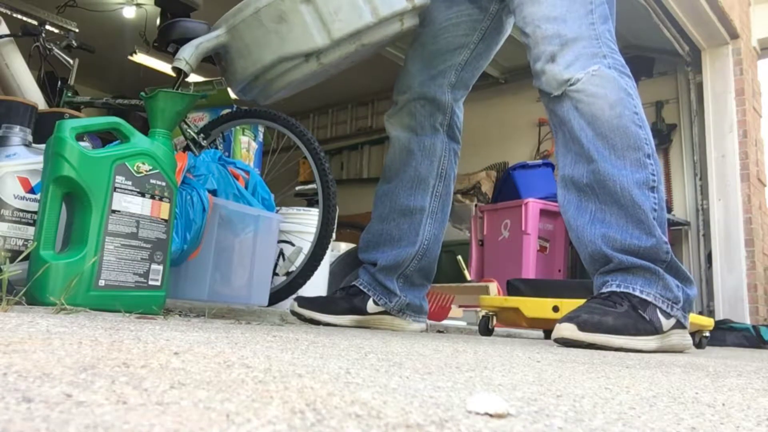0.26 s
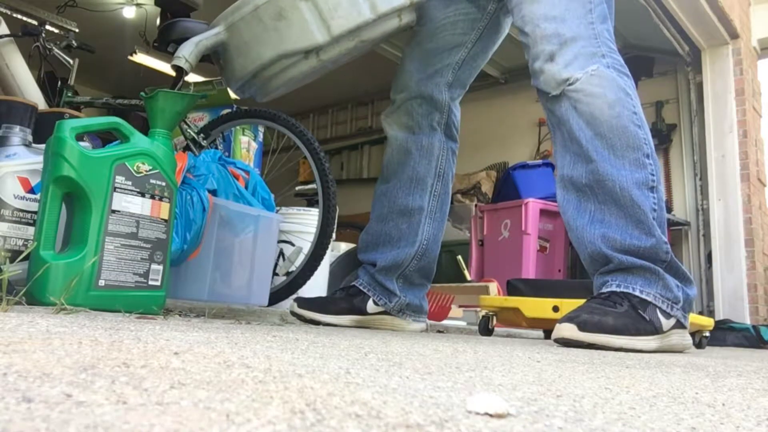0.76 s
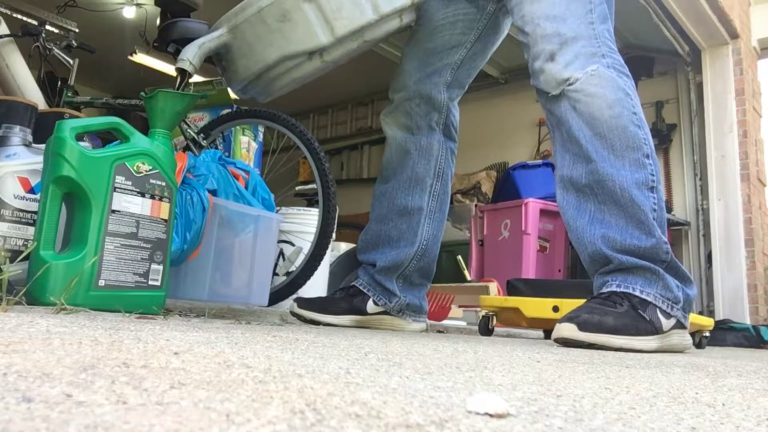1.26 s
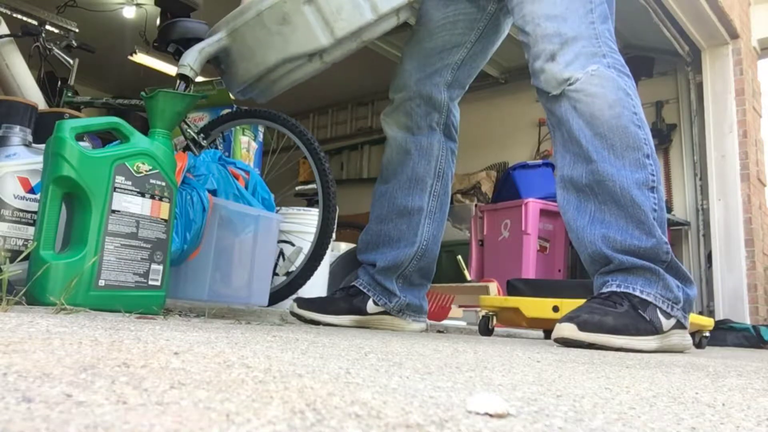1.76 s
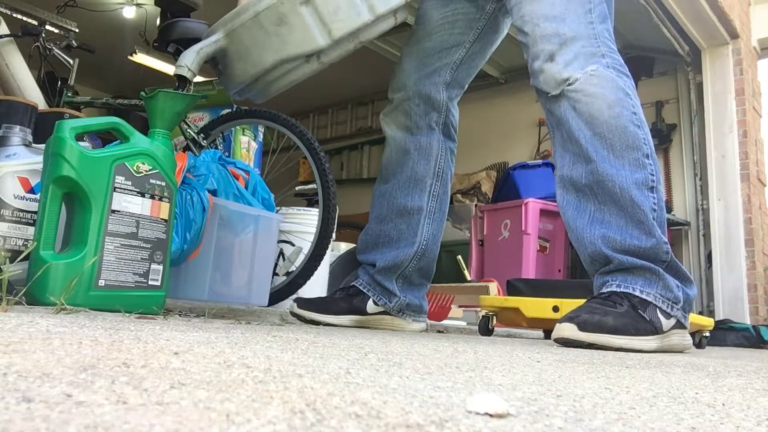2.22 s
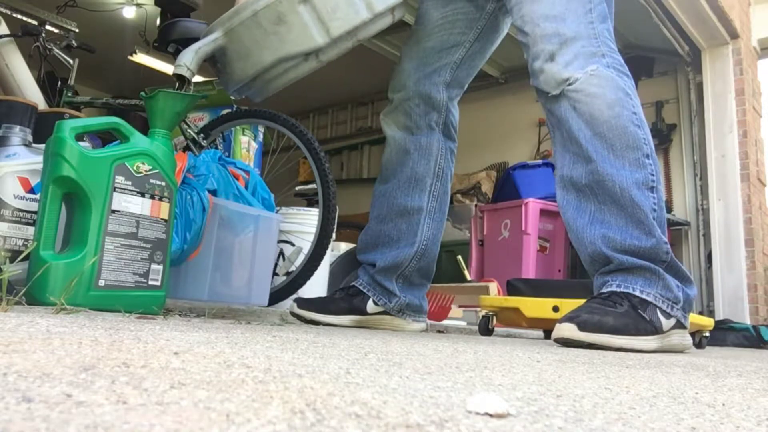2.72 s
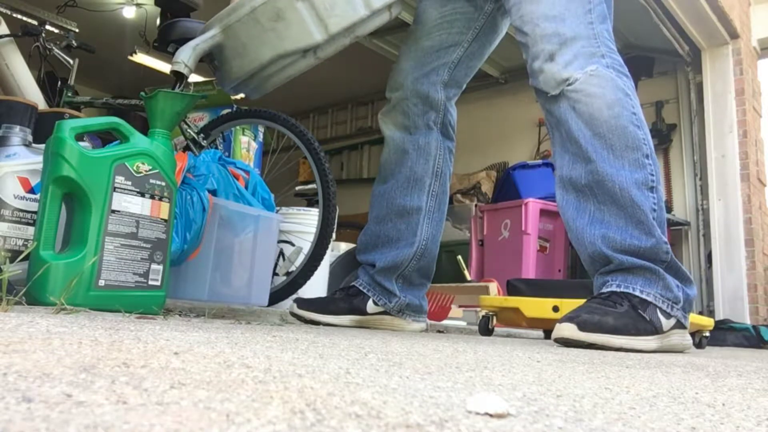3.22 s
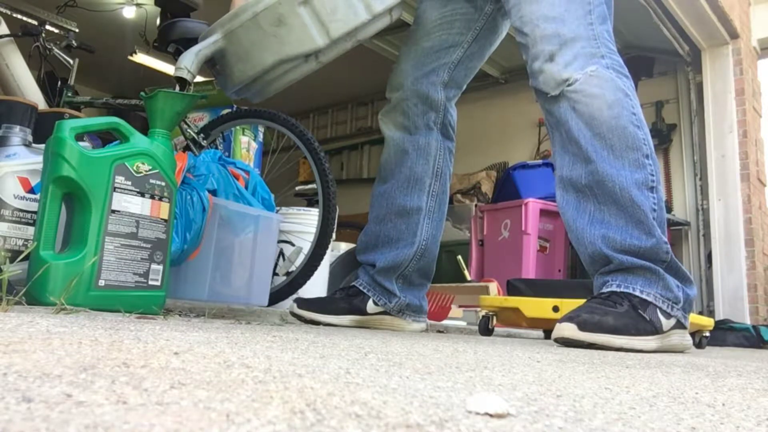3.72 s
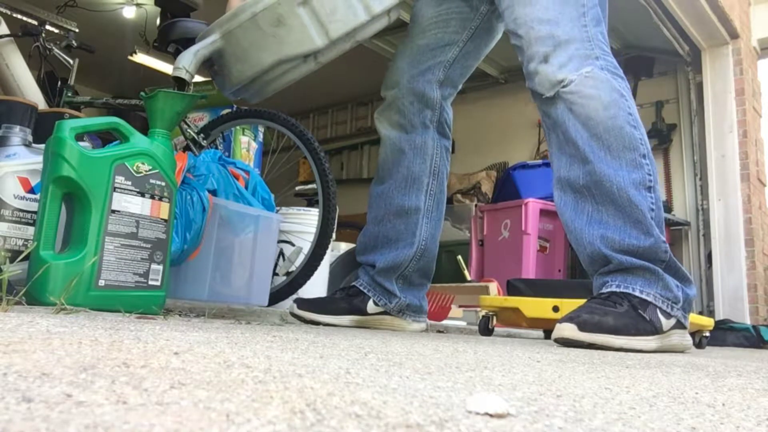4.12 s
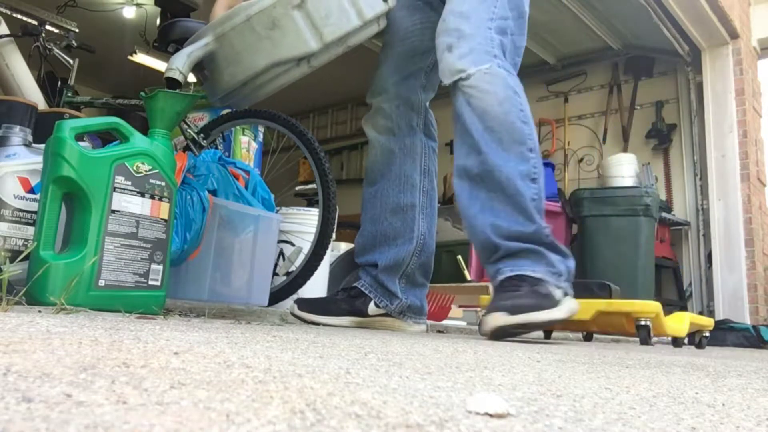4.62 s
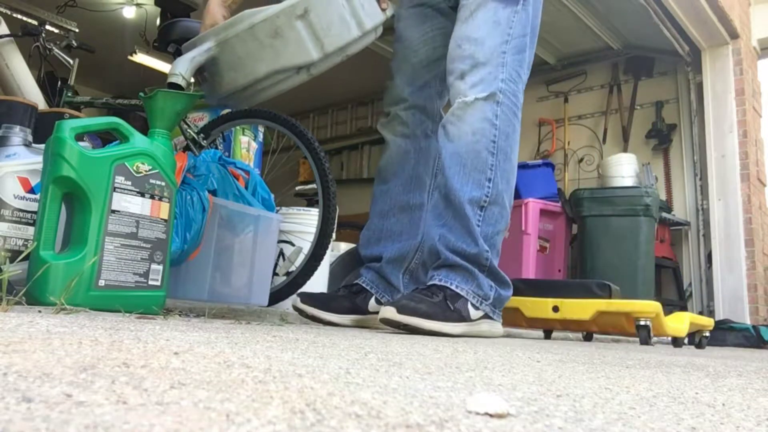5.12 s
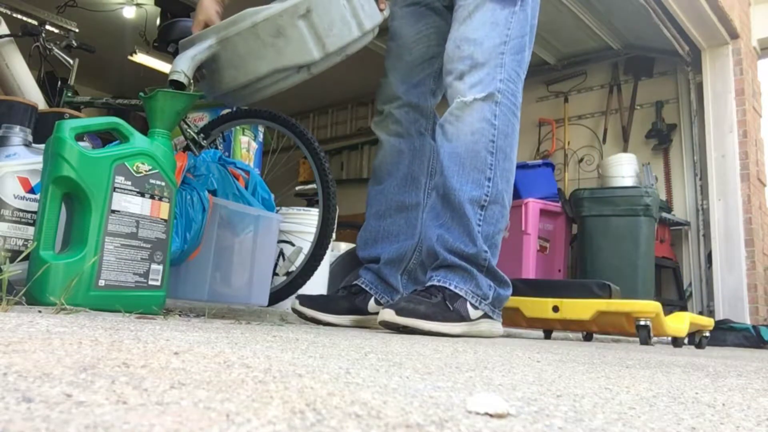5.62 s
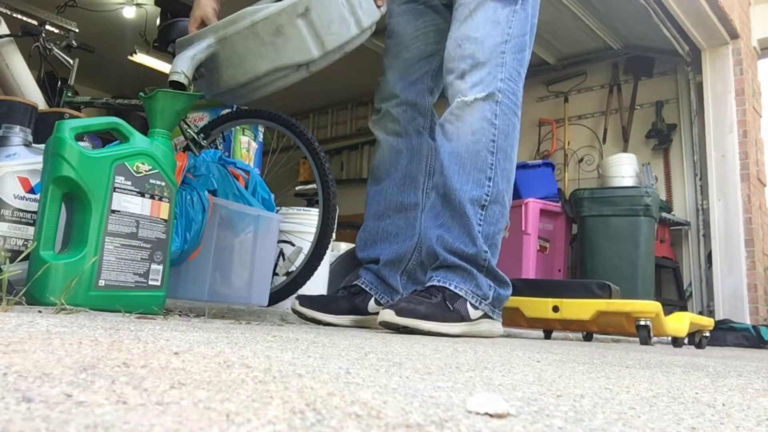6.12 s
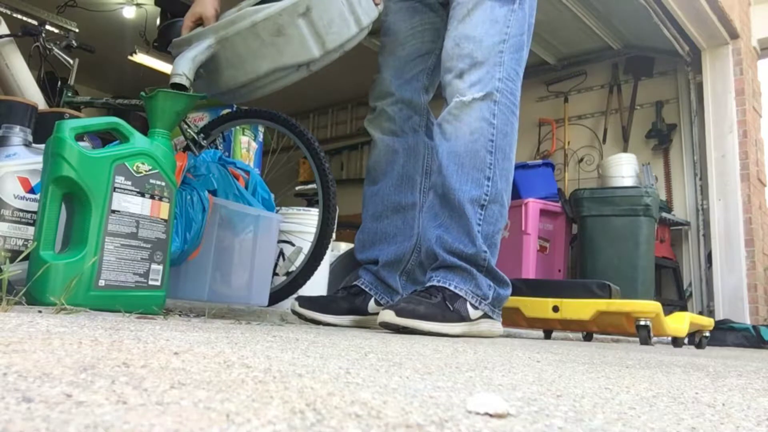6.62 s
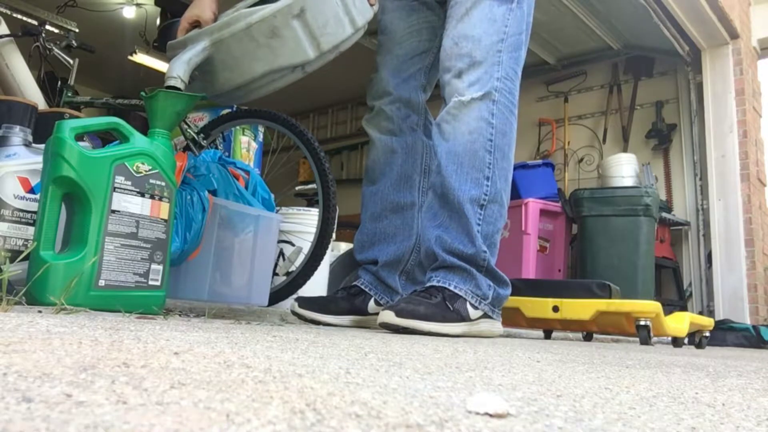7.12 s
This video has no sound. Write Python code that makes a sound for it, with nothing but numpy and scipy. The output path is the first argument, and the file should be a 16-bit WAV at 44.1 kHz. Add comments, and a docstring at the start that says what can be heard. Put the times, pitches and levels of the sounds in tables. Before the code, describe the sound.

Glugging, plopping trickle of oil into a hollow jug, interrupted by a gritty shoe drag ending in a sharp knock, over distant machine hum.

```python
"""Oil poured through a funnel

Used oil trickles from a plastic pan through a funnel into a jug: enveloped bubble swarms, plops and droplets.
Later a shoe drags in three strokes over gritty concrete and lands with a sharp knock: noise through resonances.
Two distant machines, probably air conditioners, hum and beat as detuned sines over rumble, air and hiss.
The garage answers faintly with a few echoes and a decaying noise tail."""
import sys
import numpy as np
from scipy import signal
from scipy.fft import rfft, irfft, next_fast_len
from scipy.io import wavfile
from scipy.ndimage import uniform_filter1d, map_coordinates

SR = 44100
rng = np.random.default_rng(int(sys.argv[2]) if len(sys.argv) > 2 else 0)


def wrap_up_sound(samples):
    """Save the sound to the file named by the first command line argument, as 16-bit audio."""
    columns = np.atleast_2d(samples).T
    # keep every value between -1 and 1, then stretch to whole-number steps
    tamed = np.clip(columns, -1, 1)
    steps = np.round(tamed * 32767).astype(np.int16)
    wavfile.write(sys.argv[1], SR, steps)


N = 324576  # samples

# Levels in tables are relative unless a reference is given.
# distant rumble, soft outdoor air: hz, level_db
RUMBLE_SPECTRUM = [(20, -58), (33, -19), (45, 1.5), (56, -4.5), (67, 8.5), (78, 2), (96, 0), (110, 2),
                   (135, -4), (170, -3.5), (200, -8), (230, -2.5), (330, -13), (600, -51.5)]
AIR_SPECTRUM = [(210, -53), (350, 0), (600, -5), (1050, -5.5), (1400, -12), (2300, -22), (4500, -26),
                (7000, -29), (10000, -37.5), (12000, -36), (16000, -64)]
# high outdoor hiss, perhaps insects: time_s, level_db
HISS_LEVELS = [(0, -68.5), (1.5, -66), (2.7, -73), (3.7, -93), (7.36, -67)]
# its colour: hz, level_db
HISS_SPECTRUM = [(1200, -14), (2200, 1.5), (3300, 2), (4200, 1.5), (5500, -4.5), (7000, -30),
                 (9000, -43), (14000, -53)]
# hum swell: time_s, gain_db
HUM_GAIN = [(2.6, -3), (3.3, 0.5), (5.8, 0.5), (7.2, -4.0)]

# spurts of oil leaving the pan: start_s, length_s, strength_db, fizz_share_db
SPURTS = [(0.14, 0.083, -63, -2), (0.43, 0.03, -61, -9), (0.51, 0.16, -55, 0.5), (0.736, 0.13, -53, -1.5),
          (0.883, 0.083, -51, -1.5), (1.014, 0.061, -55.5, -9), (1.237, 0.024, -59, -1.5),
          (1.389, 0.1, -59.5, -4.5), (1.8, 0.058, -56.5, -6), (1.86, 0.035, -49, -6),
          (1.91, 0.56, -45, -6.5), (2.634, 0.2, -56, -8.5), (2.853, 0.061, -46, -12),
          (2.954, 0.5, -45.5, -5), (3.427, 0.14, -50, -8), (3.787, 0.03, -67, -23),
          (3.931, 0.24, -54, -10.5), (4.204, 0.053, -51, -4), (4.3, 0.14, -46.5, -9.5),
          (4.473, 0.23, -49.5, -1.5), (5.112, 0.16, -56, -4.5), (5.214, 0.11, -53, -9.5),
          (5.4, 0.07, -61, -1), (6.072, 0.2, -56, -21), (6.242, 0.053, -50.5, -7.5),
          (6.344, 0.36, -55.5, -10.5), (6.88, 0.4, -53, -4.5), (7.113, 0.18, -49, -7.5)]
# release: time to die by 60 dB
SPURT_ATTACK_S, SPURT_SWELL_DB_PER_S, SPURT_RELEASE_S = 0.026, 0.5, 0.37
# thread of oil running on between spurts
DRIBBLE_DB, DRIBBLE_FIZZ_DB, DRIBBLE_SWING_DB = -66, -8, 1
# lumps in the stream
LUMP_SWING_DB, LUMPS_PER_S = 2.5, 70
# air booming in the jug: level at full stream, full-stream strength, dB gained per dB of flow
BOOM_DB, FULL_STREAM_DB, BOOM_DB_PER_FLOW_DB = -48, -44.5, 1.24
# flecks of oil spat against the funnel; level relative to the fizz
FLECKS_PER_S, FLECK_DB = 45, -22.5
# share of large bubbles, mostly growing as oil pools in the funnel: time_s, share_db
GURGLE_SHARE = [(0.6, -9.5), (2.6, -7), (3.3, -2), (4.0, -5), (4.5, -1), (7.3, 1)]
# stream colours: hz, level_db
GURGLE_SPECTRUM = [(150, -28), (260, -10), (480, -4.5), (700, 0), (950, -3.5), (1400, -19), (3000, -60)]
FIZZ_SPECTRUM = [(1200, 4), (2300, -3.5), (3400, -2.5), (4800, -9.5), (6900, -6), (8000, -28.5),
                 (11000, -35), (16000, -33)]
BOOM_SPECTRUM = [(150, -2.5), (215, 2.5), (242, 7.5), (290, 2.0), (360, -10.5), (600, -53.5)]
BABBLE_TREBLE = [(2500, -24), (8000, -11)]
FLECK_SPECTRUM = [(3000, -11), (8000, 3), (16000, -16.5)]
# funnel and jug cavity resonances: hz, width_hz, level_db
CAVITY_MODES = [(700, 29, -3.5), (1114, 117, 2), (1700, 46, -3.5), (2094, 60, -3.5)]
# large bubbles bursting in the funnel: start_s, level_db, nominal_pitch_hz, spatter_db (relative to level)
PLOPS = [(0.555, -32, 1970, -7.5), (0.614, -32.5, 1230, -6.5), (0.817, -37, 1180, -12),
         (0.949, -34.5, 1840, -6), (1.06, -32, 1770, -19), (1.151, -29.5, 1235, -22),
         (1.519, -36, 1790, -9.5), (1.609, -41.5, 1136, -24), (1.644, -32, 1120, -24),
         (1.778, -39, 1110, -18), (1.916, -18.5, 1640, -31), (1.984, -25, 1065, -24),
         (2.033, -32, 1240, -16), (2.059, -27, 1080, -15), (2.11, -27, 1090, -12), (2.169, -27, 1082, -10),
         (2.29, -28, 1130, -9), (2.337, -25, 1180, -20), (2.479, -28.5, 1110, -9.5),
         (2.604, -35.5, 1150, -39), (2.688, -32.5, 1126, -32), (2.729, -33.5, 1130, -27),
         (2.887, -28, 688, -34), (3.115, -29, 1100, -36), (3.368, -20.5, 1050, -26),
         (3.583, -35.5, 1100, -34), (3.717, -41.5, 1010, -31), (3.928, -37, 950, -39),
         (3.963, -35, 1150, -43), (4.158, -36.5, 1680, -9), (4.404, -28.5, 633, -35),
         (4.442, -33, 1280, -13), (4.502, -27.5, 1117, -14), (4.537, -27.5, 683, -10),
         (4.625, -25, 1840, -24), (5.311, -38, 1080, -35), (6.102, -38.5, 1200, -41),
         (6.196, -34, 1245, -22), (6.278, -34.5, 1120, -16), (6.61, -28, 1184, -45),
         (6.697, -36, 690, -11.5), (6.827, -34, 646, -17.5), (6.903, -36, 1145, -23),
         (6.972, -34, 770, -26), (7.271, -26.5, 1150, -45)]
PLOP_PITCH_SCALE = 0.979
# clearest small ringing droplets: start_s, level_db, pitch_hz
DROPLETS = [(0.6136, -23, 4400), (0.763, -24.5, 3140), (1.7478, -28, 4530), (1.9454, -25, 3470),
            (2.0402, -22.5, 5270), (2.122, -21, 3300), (2.2874, -27, 4380), (2.5, -22, 3310),
            (3.014, -25, 4350), (3.21, -23, 2820), (3.34, -20.5, 3390), (3.3985, -24, 6500),
            (3.5825, -29, 3300), (5.2648, -24.5, 4230), (6.6817, -27.5, 2940), (7.2512, -25.5, 2760),
            (7.308, -27, 3860)]
# dry ticks of grit and plastic: start_s, level_db
TICKS = [(0.9342, -45), (2.106, -47), (3.01, -47.5), (3.07, -50), (3.331, -46), (4.0686, -46),
         (4.3152, -40.5), (4.492, -45), (4.5225, -37.5), (5.167, -55), (6.3893, -53), (6.528, -50.5),
         (7.1188, -44), (7.2103, -53), (7.306, -50)]

# sole drags: start_s, length_s, rise_s, rub_db, shake_db
DRAGS = [(4.468, 0.18, 0.18, -48, -72), (4.646, 0.058, 0.037, -31, -56),
         (4.759, 0.073, 0.0032, -34.5, -32.5)]
# time to die by 60 dB: drag, then the rustle of loose sand and shoe
DRAG_RELEASE_S, SETTLE_S = 0.049, 0.46
# rustle relative to the drag
RUB_SETTLE_DB, SHAKE_SETTLE_DB = -15.5, -14
# colour of the rubbing sole: hz, level_db
SOLE_SPECTRUM = [(100, -15), (400, -7.5), (750, -2), (1100, 4), (2000, -9), (3700, -3.5), (5000, -9),
                 (8000, -16.5), (11000, -23.5), (16000, -27)]
# sole peeling off loose grit
PEEL_S, PEEL_LENGTH_S, PEEL_DB, PEEL_GRAINS_PER_S = 4.52, 0.091, -52.5, 180
# colour of those grains: hz, level_db
PEEL_SPECTRUM = [(600, -11), (2500, 1), (8000, -2.5), (16000, -9)]
# shoe landing: start_s, level_db
KNOCKS = [(4.8107, -13.5), (4.825, -24.5), (4.8443, -28.5)]
# resonances of the landing: hz, width_hz, level_db
KNOCK_MODES = [(1060, 200, -20), (1540, 130, -2), (2320, 210, 2.5), (2990, 130, -1.5), (3630, 410, -8)]

# garage decay: hz, t60_s
GARAGE_DECAY = [(200, 0.17), (2000, 0.13), (10000, 0.16)]
# walls of jugs and garage: delay_s, level_db
ECHOES = [(.0052, -36.5), (0.0127, -18.5), (0.0225, -20.5)]
TOP_HZ = 15900


def amp(db):
    """Decibels to gain."""
    return 10 ** (np.asarray(db) / 20)


def unit(x):
    """Scale to rms 1."""
    return x / np.sqrt(np.mean(x ** 2) + 1e-20)


def along(points, hz):
    """Interpolate (hz, value) points on a log-frequency axis."""
    f, v = np.transpose(points)
    return np.interp(np.log(hz + 1), np.log(f), v)


def curves(rows):
    """One value per sample for each column after the time."""
    s, *cols = np.transpose(rows)
    return [np.interp(np.arange(N) / SR, s, c) for c in cols]


def wobble(knots_per_s):
    """Smooth random curve."""
    knots = rng.standard_normal(int(N * knots_per_s / SR) + 4)
    return map_coordinates(knots, [np.arange(N) * knots_per_s / SR])


def filtered(x, response):
    """Apply a complex frequency response."""
    m = next_fast_len(N + SR // 2)
    return irfft(rfft(x, m) * response(np.fft.rfftfreq(m, 1 / SR)), m)[:N]


def coloured(x, spectrum):
    """Shape x by a spectrum, at rms 1."""
    return unit(filtered(x, lambda hz: amp(along(spectrum, hz))))


def noise(spectrum):
    """Coloured noise of rms 1."""
    return coloured(rng.standard_normal(N), spectrum)


def bandpassed(x, order, low_hz, high_hz):
    """Butterworth band-pass."""
    sos = signal.butter(order, [low_hz, high_hz], "bandpass", fs=SR, output="sos")
    return signal.sosfilt(sos, x)


def add(track, s, sound):
    """Mix a sound into a track at a time."""
    part = track[max(round(s * SR), 0):][:len(sound)]
    part += sound[:len(part)]


def resonances(modes, hz):
    """Causal response of (hz, width_hz, level_db) modes, alternating in sign."""
    total = 0
    for k, (centre, width, db) in enumerate(modes):
        damping = 1j * hz * width
        total = total + (-1) ** k * amp(db) * damping / (centre * centre - hz * hz + damping)
    return total


def cavity(hz):
    """Response of the air in the funnel and the jug's neck."""
    return resonances(CAVITY_MODES, hz)


def envelope(s, length, attack, release, swell_db_per_s=0):
    """Linear rise, swell until length, then die by 60 dB in the release time."""
    t = np.arange(N) / SR - s
    swell_db = swell_db_per_s * np.clip(t, 0, length)
    fall_db = 60 * np.clip((t - length) / release, 0, 2)
    return np.clip(t / attack, 0, 1) * amp(swell_db - fall_db)


def cracks(per_s, t60):
    """Tiny noise bursts at random moments."""
    t = np.arange(SR // 50) / SR
    hits = (rng.random(N) < per_s / SR) * rng.uniform(0.5, 1, N)
    return signal.fftconvolve(hits, amp(-60 * t / t60))[:N] * rng.standard_normal(N)


def bubble(t, hz, cycles, glide, onset):
    """Ringing bubble: swells over onset cycles, glides from hz to hz * (1 + glide), dies by 1/e in cycles."""
    turns = hz * t
    phase = turns + glide * (turns - cycles * (1 - np.exp(-turns / cycles)))
    return np.sin(2 * np.pi * phase) * np.exp(-turns / cycles) * (1 - np.exp(-turns / onset))


def swarm(per_s, centre_hz, spread, cycles, glide, size_db):
    """Bubbles of random pitch, life and size in clumps averaging four, levelled over a fifth of a second."""
    count = int(per_s * N / SR)
    clump = rng.random(N // 40)
    place, life, lag = rng.random((count, 3), dtype=np.float32).T[:, :, None]
    clump_index = (place * count / 4).astype(int) % len(clump)
    when = clump[clump_index] * N + .022 * SR * lag ** 2
    pitch, size = np.clip(rng.standard_normal((count, 2), dtype=np.float32), -2, 2).T[:, :, None]
    index = np.arange(SR // 80)
    hz = np.minimum(centre_hz * np.exp(spread * pitch), SR / 3)
    lives = cycles * 4 ** (life - .5)
    grains = amp(size_db * size) * bubble(np.float32(index / SR), hz, lives, glide, onset=0.22)
    x = np.bincount((when.astype(int) + index).ravel(), grains.ravel(), N)[:N]
    power = np.abs(uniform_filter1d(x * x, SR // 5))
    return x / np.sqrt(power + 1e-9)


def machines(hum_hz=118.65, beat_hz=1.805, shaft_hz=58.3):
    """Two motors run a little apart in speed, so their hums beat."""
    t = np.arange(N) / SR
    phase = 2 * np.pi * hum_hz * t + 0.21 * wobble(2.89)
    beat = 2 * np.pi * beat_hz * (t - .1)
    hum = amp(-48.0) * np.sin(phase) + amp(-51.0) * np.sin(phase + beat)
    shaft = amp(-51.0 + 1.6 * wobble(7.4)) * np.sin(2 * np.pi * shaft_hz * t + .5 * wobble(1.4))
    overtone = amp(-64.0) * np.sin(2 * phase + wobble(4.2))
    hum_db, = curves(HUM_GAIN)
    return amp(hum_db) * hum + shaft + overtone


def outdoors():
    """Distant rumble, soft air and a high hiss, each as coloured noise."""
    rumble = amp(-48.5) * noise(RUMBLE_SPECTRUM)
    air = noise(AIR_SPECTRUM) * amp(-60.5 + 0.37 * wobble(3.3))
    hiss_db, = curves(HISS_LEVELS)
    return rumble + air + amp(hiss_db) * noise(HISS_SPECTRUM)


def pouring():
    """Gains of the stream and of its fizz: lumpy spurts over a thin dribble."""
    dribble = amp(DRIBBLE_DB + DRIBBLE_SWING_DB * wobble(12))
    flow, froth = np.zeros((2, N))
    for s, length, db, fizz_db in SPURTS:
        spurt = amp(db) * envelope(s, length, SPURT_ATTACK_S, SPURT_RELEASE_S, SPURT_SWELL_DB_PER_S)
        flow = np.maximum(flow, spurt)
        froth = np.maximum(froth, amp(fizz_db) * spurt)
    lumps = amp(LUMP_SWING_DB * wobble(LUMPS_PER_S))
    return lumps * (flow + dribble), lumps * (froth + amp(DRIBBLE_FIZZ_DB) * dribble)


def stream():
    """The stream folds air into the oil: boom and gurgles in the jug, babble in the funnel, fizz on the surface."""
    flow, froth = pouring()
    boom_gain = amp(BOOM_DB) * (flow / amp(FULL_STREAM_DB)) ** BOOM_DB_PER_FLOW_DB
    boom = boom_gain * noise(BOOM_SPECTRUM)

    gurgle_db, = curves(GURGLE_SHARE)
    large = swarm(per_s=500, centre_hz=577.7, spread=0.453, cycles=2.9, glide=0.057, size_db=3.5)
    gurgle = amp(gurgle_db) * coloured(large, GURGLE_SPECTRUM)

    pops = swarm(per_s=800, centre_hz=1419, spread=0.312, cycles=1.48, glide=0.045, size_db=3.0)
    babble = unit(unit(filtered(pops, cavity)) + amp(-5.5) * coloured(pops, BABBLE_TREBLE))

    crackle = swarm(per_s=700, centre_hz=3700, spread=.38, cycles=7, glide=.004, size_db=7)
    snaps = unit((rng.random(N) < 900 / SR) * rng.standard_normal(N))  # thin oil films
    fizz = coloured(crackle + amp(-9.0) * snaps, FIZZ_SPECTRUM)
    flecks = amp(FLECK_DB) * coloured(cracks(FLECKS_PER_S, t60=0.013), FLECK_SPECTRUM)
    return boom + flow * (gurgle + amp(-0.5) * babble) + froth * (fizz + flecks)


def wall_echoes(x):
    """Delayed, weaker copies from hard walls."""
    return sum(amp(db) * np.pad(x, (round(delay * SR), 0))[:N] for delay, db in ECHOES)


def garage(x):
    """Reverberant noise tail, 5 ms late; each frequency dies at its own speed."""
    hz, t, z = signal.stft(rng.standard_normal(SR // 2), SR, nperseg=256)
    fade = amp(-60 * t / along(GARAGE_DECAY, hz)[:, None])
    tail = signal.istft(z * fade, SR, nperseg=256)[1]
    return signal.fftconvolve(x, np.pad(tail, (SR // 200, 0)) / np.linalg.norm(tail))[:N]


def plops():
    """Thick oil damps large bubbles quickly; each sheds a smaller one, rings the funnel and throws a spatter."""
    rings, bursts, spray = np.zeros((3, N))
    t = np.arange(SR // 12) / SR
    splutter = (amp(-60 * t / .03) + amp(-12 - 60 * t / .06)) * (1 - np.exp(-t / .0005))
    for s, db, hz, spatter_db in PLOPS:
        lag, smaller = rng.random(2)
        main = bubble(t, hz * PLOP_PITCH_SCALE, cycles=5.5, glide=0.031, onset=0.4)
        shed = bubble(t, hz * (1.2 + .5 * smaller), cycles=5.3, glide=0.025, onset=0.5)
        add(rings, s, amp(db - 1.0) * main)
        add(rings, s + .008 * lag, amp(db - 7.5) * shed)
        add(bursts, s, amp(db - 13.5) * splutter * rng.choice([-1., 1.], len(t)))
        add(spray, s, amp(db + spatter_db + 7.5) * splutter * rng.standard_normal(len(t)))
    wet = bandpassed(bursts, 3, 500, 2600)
    spatter = bandpassed(spray, 4, 2200, 5200)
    return rings + amp(5.5) * wet + spatter + amp(12.5) * filtered(bursts, cavity)


def droplets():
    """Tiny bubbles ring high and clear, sinking slightly in pitch."""
    track, t = np.zeros(N), np.arange(SR // 20) / SR
    for s, db, hz in DROPLETS:
        add(track, s, amp(db - 10.0) * bubble(t, hz, cycles=10.0, glide=-0.011, onset=0.85))
    return track


def ticks():
    """Short broad cracks with a faint scatter behind them."""
    track, t = np.zeros(N), np.arange(SR // 20) / SR
    fade = amp(-60 * t / .009) + amp(-14 - 60 * t / .05)
    onset = 1 - np.exp(-t / 0.00022)
    for s, db in TICKS:
        add(track, s, amp(db + 6) * fade * onset * rng.standard_normal(len(t)))
    return bandpassed(track, 1, 1800, 7500)


def dragging():
    """Gains of the sole's rub and of the shaking it gives the shoe, over all drags."""
    rub, shaking = np.zeros((2, N))
    for s, length, rise, db, shake_db in DRAGS:
        stroke = envelope(s, length, rise, DRAG_RELEASE_S)
        settle = envelope(s, length, rise, SETTLE_S)
        rub += amp(db) * np.maximum(stroke, amp(RUB_SETTLE_DB) * settle)
        shaking += amp(shake_db) * np.maximum(stroke, amp(SHAKE_SETTLE_DB) * settle)
    return rub, shaking


def peel():
    """Single grains of grit crack as the sole rolls off them."""
    grit = coloured(cracks(PEEL_GRAINS_PER_S, t60=0.0052), PEEL_SPECTRUM)
    return amp(PEEL_DB) * envelope(PEEL_S, PEEL_LENGTH_S, .01, DRAG_RELEASE_S) * grit


def knocks():
    """Each blow of the landing: a hard first contact, then a decaying crunch of random signs."""
    blows, t = np.zeros(N), np.arange(SR // 12) / SR
    fade = amp(-3.0 - 60 * t / 0.022) + amp(-13 - 60 * t / 0.061)
    for s, db in KNOCKS:
        crunch = fade * rng.choice([-1., 1.], len(t))
        crunch[0] = amp(13)  # first contact
        add(blows, s, amp(db) * crunch)
    return blows


def shoe():
    """Sand crunches under the dragging sole; shaking and landing blows excite the same resonances."""
    grit = (rng.random(N) < 3500 / SR) * rng.standard_normal(N)
    rub, shaking = dragging()
    drag = rub * coloured(unit(grit) + amp(-1.0) * rng.standard_normal(N), SOLE_SPECTRUM)
    shake = rng.standard_normal(N)

    def body(hz):
        """Landing modes with a treble roll-off."""
        return resonances(KNOCK_MODES, hz) / (1 + (hz / 7000) ** 2)

    ringing = filtered(knocks() + shaking * shake, body) / np.std(filtered(shake, body))
    return peel() + drag + ringing


def scene():
    """Oil and shoe in front of the garage, over the outdoor background."""
    background = machines() + outdoors()
    oil = stream() + plops() + droplets() + ticks()
    step = shoe()
    room = garage(amp(-11) * oil + amp(-19.5) * step)
    return (background + oil + wall_echoes(oil) + step + room)[None]


def record(dry):
    """Roll off the deepest bass (-6 dB at 26 Hz) and cut everything from TOP_HZ up."""
    return filtered(dry[0], lambda hz: (hz < TOP_HZ) * hz ** 4 / (hz ** 4 + 26 ** 4))[None]


dry = scene()
out = record(dry)
wrap_up_sound(out)
```